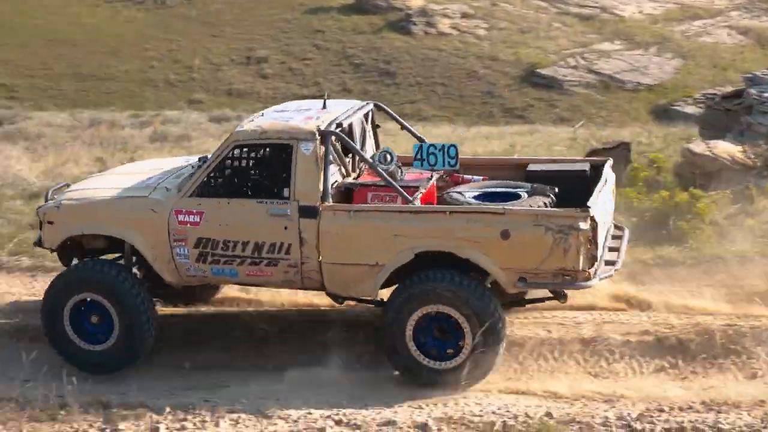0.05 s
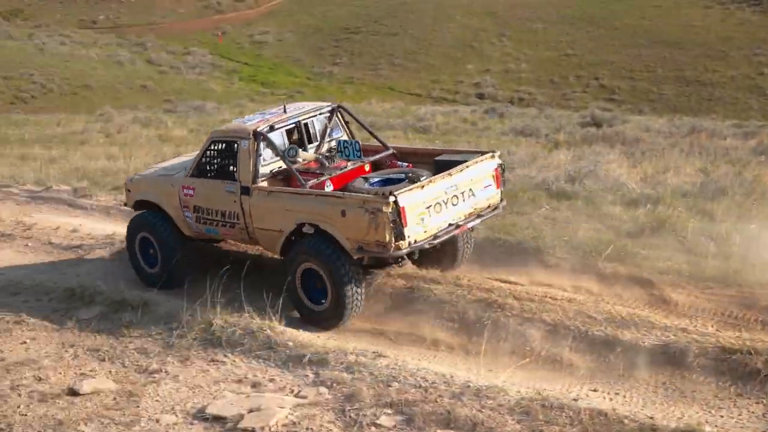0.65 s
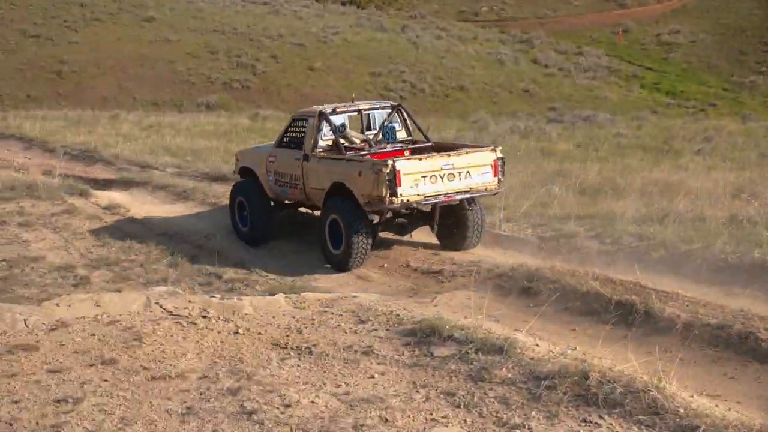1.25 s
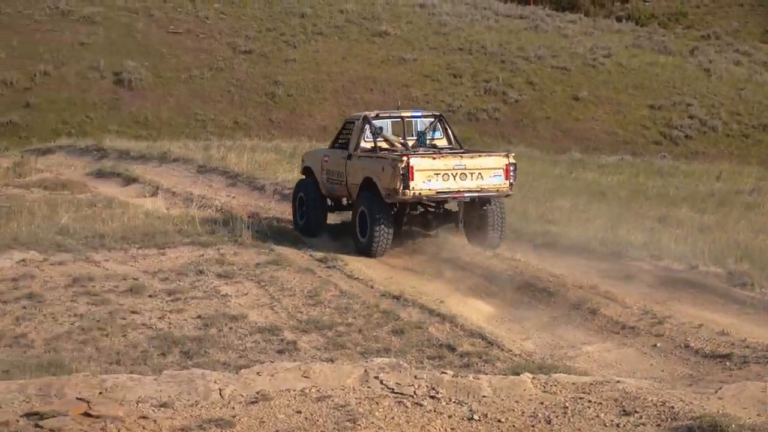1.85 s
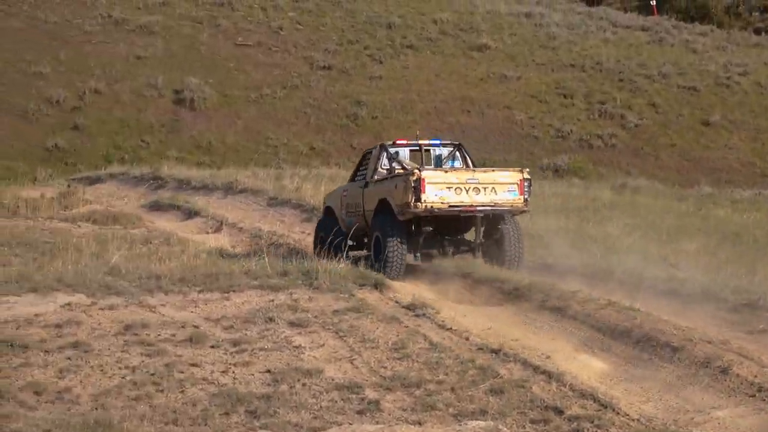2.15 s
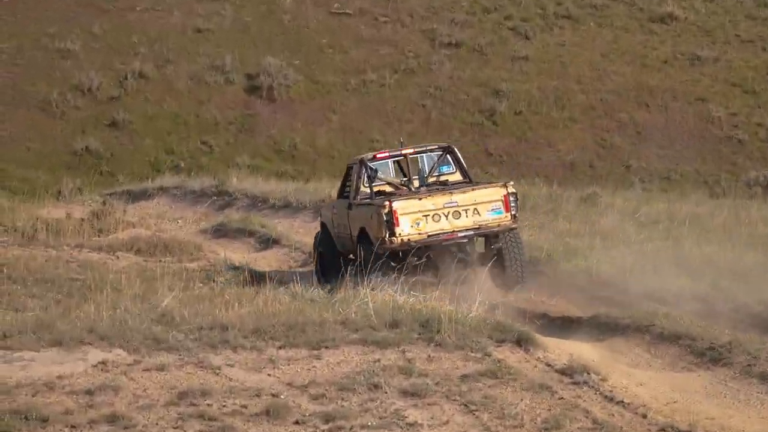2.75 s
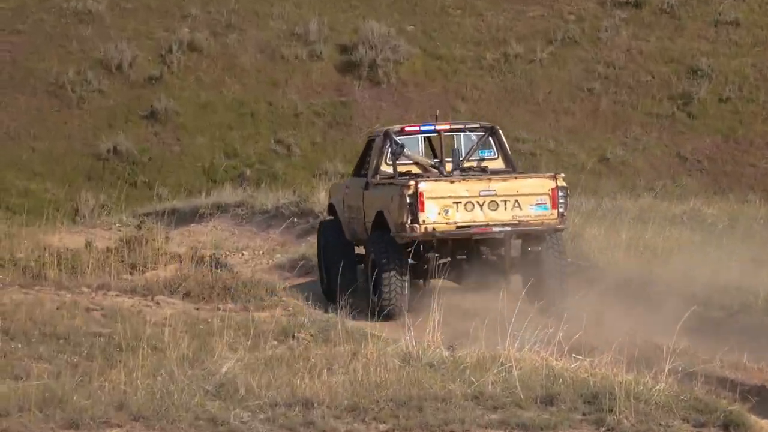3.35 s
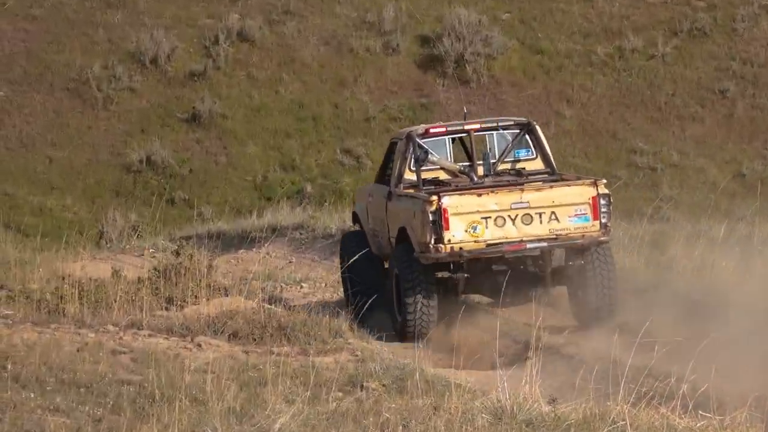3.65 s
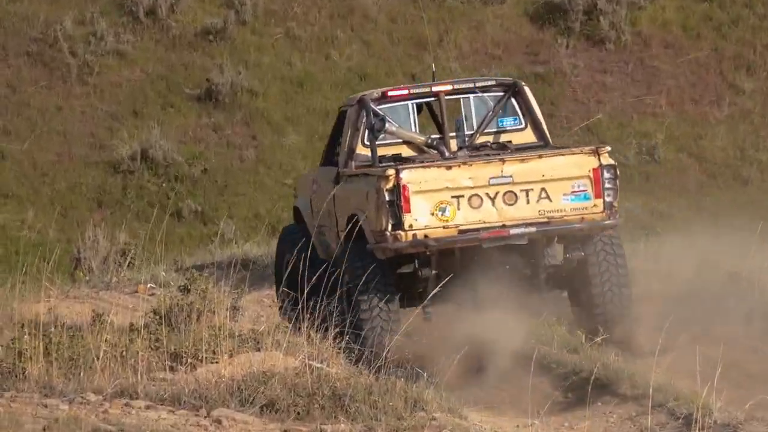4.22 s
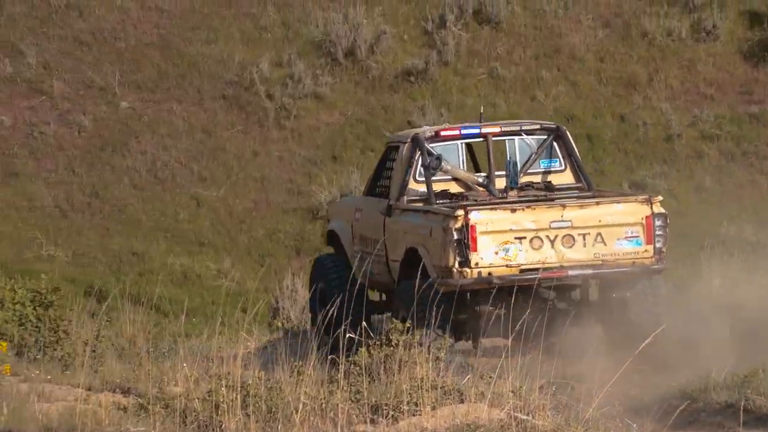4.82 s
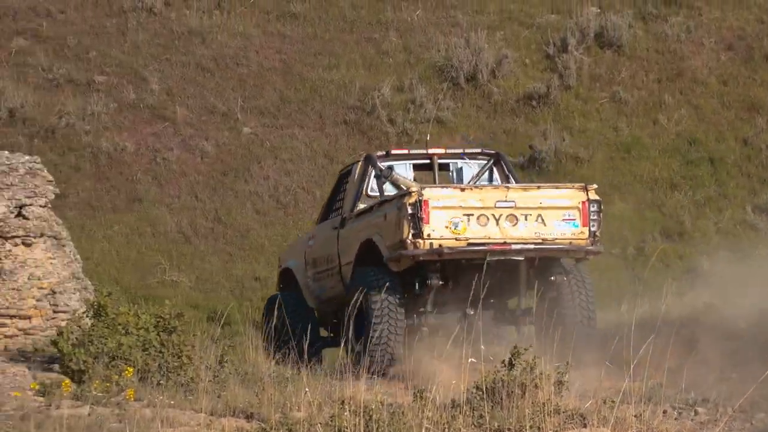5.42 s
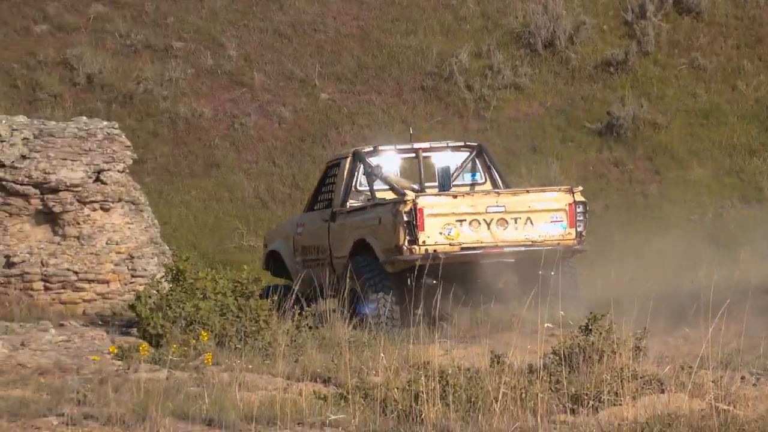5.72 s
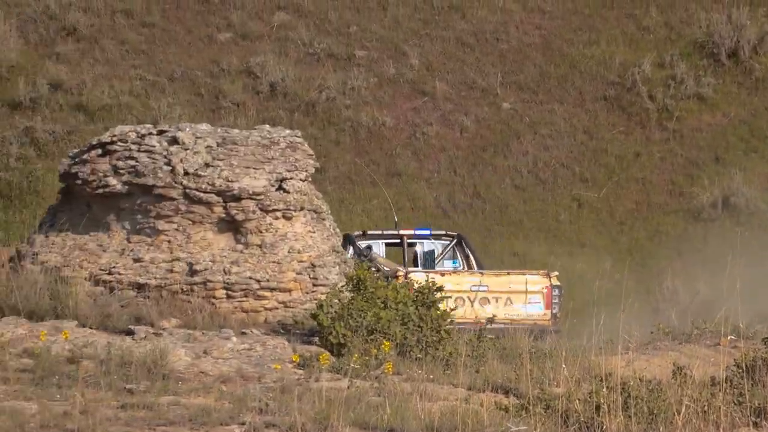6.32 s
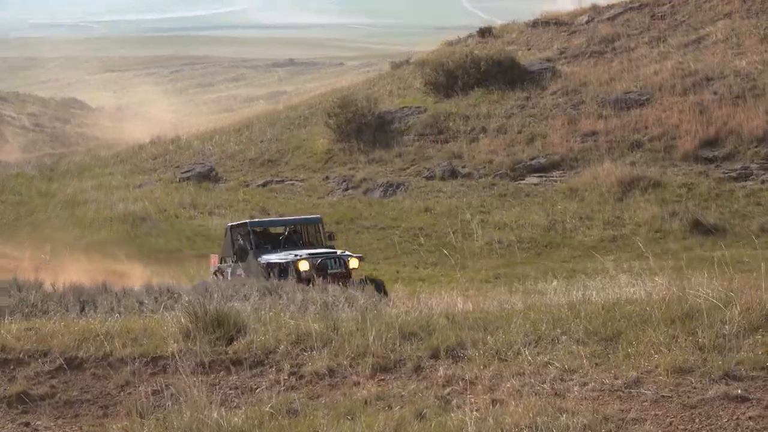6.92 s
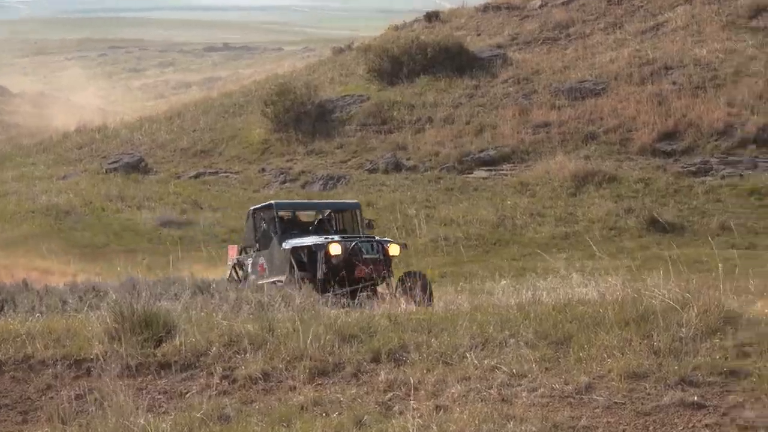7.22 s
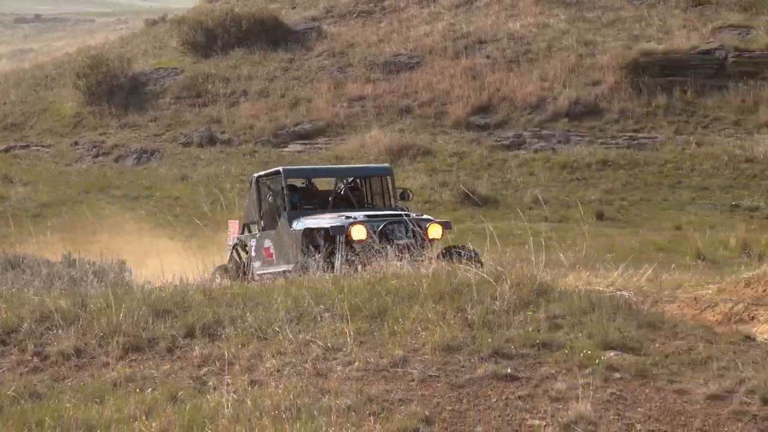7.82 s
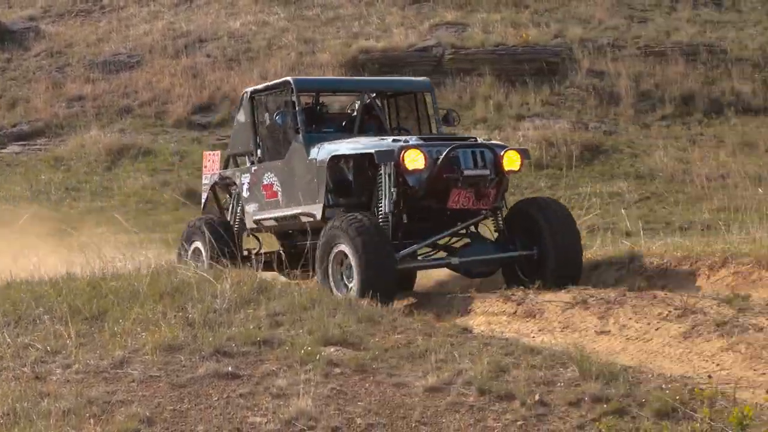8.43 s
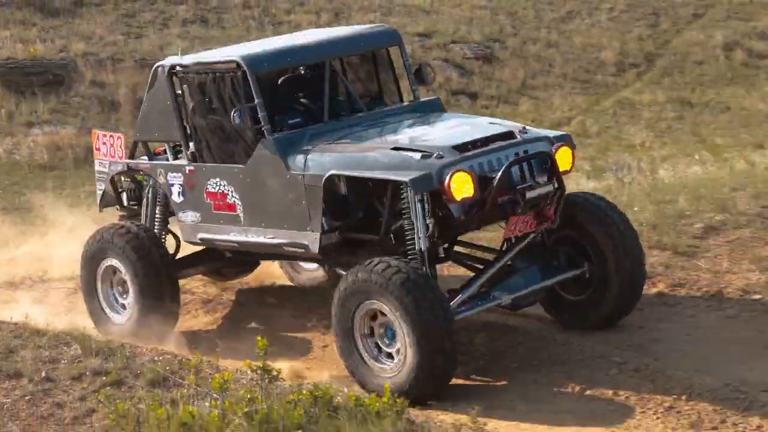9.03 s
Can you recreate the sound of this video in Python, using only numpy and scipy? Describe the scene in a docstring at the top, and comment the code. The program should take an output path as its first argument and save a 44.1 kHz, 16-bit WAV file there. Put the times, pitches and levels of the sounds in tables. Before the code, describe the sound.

Outdoors in a light breeze, a race truck crawls away with a low, surging drone, rattling bodywork, clunks and short rasping squeaks. Far-off engines rise in pitch. The sound then switches with a click to heavy wind rumbling on the microphone and an approaching V8 buggy, its revs rising and falling, its rasp and tyre crunch swelling near the end.

```python
"""A dirt trail. A four-cylinder race truck crawls away in a breeze: exhaust droning, tyres crunching,
chassis knocking in the ruts, dry suspension joints squeaking, while two distant racers wind up.
Then the scene changes with a click: a V8 buggy approaches, revving in waves, and gusts of wind
buffet the two microphone ports."""
import sys
import numpy as np
from scipy import signal
from scipy.fft import rfft, irfft, next_fast_len
from scipy.io import wavfile
from scipy.ndimage import uniform_filter1d, minimum_filter1d

SR = 44100
rng = np.random.default_rng(int(sys.argv[2]) if len(sys.argv) > 2 else 0)


def store_wav(level_fs):
    """Save 16-bit WAV to argv[1]."""
    pcm = np.round(np.clip(np.atleast_2d(level_fs), -1, 1) * 32767)
    wavfile.write(sys.argv[1], SR, pcm.T.astype(np.int16))


N = 404397
T = np.arange(N) / SR
CHANGE_S = 6.447
TREBLE_HZ, BUFFET_HZ = (4400, 8000), (400, 800)


def amp(db):
    """dB to gain."""
    return 10 ** (np.asarray(db) / 20)


def decibels(gain):
    """Gain to dB."""
    return 20 * np.log10(np.maximum(gain, 1e-9))


def unit(x):
    """Scales to rms 1."""
    return x / np.sqrt(np.mean(x ** 2) + 1e-20)


def lookup(spectrum, hz, column=1):
    """Table column, interpolated over log frequency."""
    table = np.transpose(spectrum)
    return np.interp(np.log(hz + 1), np.log(table[0] + 1), table[column])


def curves(rows):
    """Columns of a time table, per sample."""
    times_s, *columns = np.transpose(rows)
    return [np.interp(T, times_s, column) for column in columns]


def add(mix, start_s, sound):
    """Mixes a sound in at start_s."""
    part = mix[max(round(start_s * SR), 0):][:len(sound)]
    part += sound[:len(part)]


def filtered(x, response):
    """Applies the gain response(f/Hz)."""
    size = next_fast_len(len(x), True)
    return irfft(rfft(x, size) * response(np.fft.rfftfreq(size, 1 / SR)), size)[:len(x)]


def coloured(x, spectrum, band_hz):
    """Shapes x by a spectrum; rms 1 within the band."""
    x = filtered(x, lambda f: amp(lookup(spectrum, f)))
    return x / np.std(filtered(x, lambda f: (f > band_hz[0]) & (f < band_hz[1])))


def hiss(size=N):
    """White noise."""
    return rng.standard_normal(size)


def drift(rate_hz):
    """Smooth random wander up to rate_hz, rms 1."""
    step = 16
    slow = filtered(hiss(N // step + 1), lambda f: 1 / (1 + (f / step / rate_hz) ** 4))
    return unit(np.interp(T, np.arange(len(slow)) * step / SR, slow))


def swell(peak_s, width_s):
    """Gaussian rise and fall."""
    return np.exp(-((T - peak_s) / width_s) ** 2 / 2)


# Port differences: f/Hz, right lead/rad, scatter level/dB
PORTS = [(40, .5, -21), (85, 0.84, -28.5), (145, 1.7, -20), (220, 1.25, -10.5), (380, 2.05, -9),
         (700, 0.98, -7.5), (1400, 0.61, -16.5), (3000, 0.33, -34.5), (7000, .15, -11)]
def ports(x):
    """Sound reaches the right port first; ground scatter differs between ports."""
    scatter = hiss(2048) * np.hanning(2048)
    scattered = signal.oaconvolve(x, scatter / np.linalg.norm(scatter))[:N]
    side = filtered(x, lambda f: -1j * np.tan(lookup(PORTS, f) / 2))
    side += filtered(scattered, lambda f: amp(lookup(PORTS, f, column=2)))
    return np.array([x + side, x - side])


def exhaust(cycles, orders, flutter, colour_db=lambda k: 0):
    """Engine orders; the weak ones flutter most as firing strength varies."""
    note = np.zeros(N)
    for k, db in orders:
        strength = 1 + flutter * drift(11.5) * (1 if db < -5 else 0.35)
        note += amp(db + colour_db(k)) * strength * np.cos(2 * np.pi * (k * cycles + rng.random()))
    return np.sqrt(2) * note


def pulsed_noise(cycles, depth):
    """Noise swelling once a cycle."""
    return hiss() * (1 + depth * np.cos(2 * np.pi * cycles))


def panels(x, ring, t60_s=0.05):
    """Bodywork rings briefly at many close resonances."""
    t = np.arange(4096) / SR
    tail = hiss(len(t)) * amp(-60 * t / t60_s)
    ringing = signal.oaconvolve(x, tail / np.linalg.norm(tail))[:N]
    return (x + ring * ringing) / np.hypot(1, ring)


# Grit spectrum: f/Hz, level/dB
DIRT = [(1000, 7), (2500, 3), (4000, 2.5), (5200, -1), (7000, -9), (9300, -11), (10300, -19),
        (11500, -27.5), (15500, -32.5)]
def crunch(grains_per_s, grain_db, clump_db):
    """Tyres on dirt: fine hiss and clumps of cracking grit."""
    cracks = rng.random(N) < grains_per_s / SR
    grit = cracks * amp(grain_db + 2.5 * np.minimum(rng.exponential(1, N), 4))
    return coloured((1 + grit) * hiss() * amp(clump_db * drift(30)), DIRT, TREBLE_HZ)


# Firing rate: t/s, f/Hz
TRUCK_FIRING = [(0, 90.33), (0.65, 88.86), (1.2, 86.53), (1.5, 91.24), (2.26, 84.15), (2.9, 80.4),
                (3.45, 77.1), (3.69, 72.3), (4.3, 69.71), (4.7, 72.32), (5.1, 70.6), (5.5, 64),
                (6.2, 61.67), (6.44, 68.6)]
# Exhaust under throttle: t/s, level/dB
TRUCK_THROTTLE = [(0, -12.5), (0.3, -21), (1.1, -20.5), (1.33, -24.5), (1.56, -18.5), (2.3, -18.5),
                  (3.0, -21), (4.0, -19.5), (4.7, -22), (5.4, -22), (6.05, -25.5), (6.44, -23)]
# Surges: t/s, half-width/s, extra speed/ratio, boost/dB
SURGES = [(0.11, 0.071, 0.047, 2.5), (0.4, 0.048, 0.054, 0), (0.56, 0.036, .015, 5),
          (0.87, 0.096, .05, -0.5), (2.52, 0.089, .055, -0.5), (3.18, .11, .03, 1),
          (3.87, 0.0784, 0.05506, -0.5), (5.17, 0.054, .01, 2), (5.83, .11, 0.038, 2.5)]
def truck_engine():
    """The engine lugs down on a climb, surging on throttle blips or wheel slip."""
    (hz,), (db,) = curves(TRUCK_FIRING), curves(TRUCK_THROTTLE)
    for peak_s, width_s, faster, boost_db in SURGES:
        surge = swell(peak_s, width_s)
        hz, db = hz * (1 + faster * surge), db + boost_db * surge
    return hz, db


# Departure: t/s, distance/m, relative crunch level/dB
TRUCK_PATH = [(0, 3.23, -38.5), (0.35, 7.7, -37.5), (1.0, 11.1, -41), (1.4, 9.9, -39), (2.3, 23.6, -39),
              (3.6, 31.7, -36.5), (4.1, 27.7, -41), (5.2, 34.4, -43.5), (5.75, 26.7, -40),
              (6.44, 44, -39.5)]
# Exhaust orders, halves from unequal cylinders: multiple of firing rate, level/dB
TRUCK_ORDERS = [(.5, -23), (1, 1), (1.5, -29.5), (2, -15.5), (2.5, -31.5), (3, -19), (4, -31), (5, -33.5),
                (6, -35.5), (7, -31.5), (8, -33)]
# Tailpipe, gas puff and clatter spectra: f/Hz, level/dB
TAILPIPE = [(100, 0), (125, 8.5), (145, 4), (165, -2), (185, -0.5), (225, -6.5), (255, -4), (275, 2),
            (320, 1)]
PUFFS = [(60, -7), (120, 7), (180, 4.5), (270, 2.5), (380, -4), (520, -11), (800, -15), (2000, -50.5)]
CLATTER = [(250, -29.5), (450, -7.5), (560, 6), (690, 3), (870, -1.5), (1050, -4), (1350, -2.5), (2000, -5),
           (2700, -8), (4000, -18), (8000, -47.5), (12000, -48.5)]
def truck():
    """Deep exhaust drone with gas puffs, clatter and tyre crunch."""
    firing_hz, drone_db = truck_engine()
    distance_m, crunch_db = curves(TRUCK_PATH)
    near_db = decibels(distance_m[0] / distance_m)
    firings = np.cumsum(firing_hz * (1 + 0.004 * drift(22))) / SR
    drone = exhaust(firings, TRUCK_ORDERS, flutter=0.4,
                    colour_db=lambda k: lookup(TAILPIPE, k * firing_hz))
    puffs = amp(near_db - 30) * coloured(pulsed_noise(firings, depth=0.64), PUFFS, (290, 480))
    rattle = pulsed_noise(firings, depth=0.13) * amp(0.18 * drift(29))
    clatter = np.hypot(amp(near_db - 22.2), shake()) * coloured(rattle, CLATTER, (550, 2000))
    bodywork = panels(clatter, ring=0.4)
    tyres = amp(near_db + crunch_db + 3) * crunch(grains_per_s=350, grain_db=4, clump_db=1.05)
    return amp(drone_db - 0.8) * drone + puffs + bodywork + tyres


# Gusts: t/s, half-width/s, level/dB
GUSTS = [(0.22, 0.076, -30), (0.55, 0.18, -29), (1.0, 0.12, -30.5), (1.66, 0.15, -26.5), (2.17, .1, -40),
         (2.5, .12, -29.5), (2.78, 0.1, -26), (3.0, 0.076, -25.5), (4.02, .06, -38), (4.24, 0.036, -27),
         (4.5, 0.097, -46), (4.97, 0.051, -23.5), (5.2, 0.11, -23), (5.64, 0.081, -22.5), (5.92, 0.13, -26),
         (6.18, 0.11, -21), (6.505, 0.043, -5.5), (6.609, 0.06, -11), (6.75, 0.051, -17.5),
         (7.02, 0.055, -15.5), (7.59, 0.085, -13), (7.9, 0.12, -11), (8.14, 0.11, -10.5), (8.31, 0.073, -9),
         (8.47, 0.069, -9.5), (8.77, .07, -9.5), (8.98, 0.053, -9.5), (9.14, .04, -11.5)]
def wind_strength_db(steady_db):
    """Steady flow plus gusts that swell and ebb."""
    gust_power = sum((amp(db) * swell(peak_s, width_s)) ** 2 for peak_s, width_s, db in GUSTS)
    return decibels(np.sqrt(amp(steady_db) ** 2 + gust_power))


def tearing_db(wind_db):
    """Midrange buffeting grows faster than the wind."""
    return -47 + 1.41 * (wind_db + 27)


# Wind, side against mid: f/Hz, level/dB
WIND_SIDE = [(30, -22), (80, -16.5), (150, -7.5), (250, 1), (400, 2.5), (700, 5), (1500, 5), (4000, 7)]
def turbulence(spectrum, band_hz, lump_db, lean):
    """Lumpy wind noise: shared by the ports in the bass, opposed higher up, stronger on the right."""
    lumps = unit(amp(lump_db * drift(27)))
    mid, unshared = (lumps * coloured(hiss(), spectrum, band_hz) for _ in range(2))
    side = filtered(unshared, lambda f: amp(lookup(WIND_SIDE, f)))
    side += filtered(mid, lambda f: -0.3j - lean * f / (f + 120))
    return np.array([mid + side, mid - side])


# Rumble and buffeting spectra: f/Hz, level/dB
BREEZE_RUMBLE = [(10, -21.5), (25, -7), (45, 1.5), (75, 1), (130, -10), (220, -13.5), (400, -27.5),
                 (900, -52), (2000, -85), (12000, -120)]
BUFFET = [(60, -15.5), (150, 4), (280, 5.5), (400, 1), (600, -5.5), (900, -15.5), (1400, -25.5),
          (2500, -38.5), (6000, -65), (12000, -98.5)]
def breeze():
    """Light wind rumbles; only its strongest puffs reach the midrange."""
    wind_db = wind_strength_db(steady_db=-36)
    rumble = amp(wind_db - 3.5) * turbulence(BREEZE_RUMBLE, (20, 52), lump_db=-2.5, lean=0.1)
    buffet_db = np.minimum(tearing_db(wind_db) - 5.5, -42)
    return rumble + amp(buffet_db) * turbulence(BUFFET, BUFFET_HZ, lump_db=0.5, lean=0.2)


# Chassis knocks and stones: t/s, relative body level/dB, relative treble level/dB
KNOCKS = [(0.364, -14.5, -30), (0.4635, -28, -24.5), (0.4777, -26.5, -29), (0.6769, -20.5, -35),
          (0.948, -19, -45), (1.2324, -34, -34), (1.3419, -20, -31), (1.5028, -25, -55),
          (1.7697, -25.5, -39.5), (2.0, -21, -41.5), (2.364, -20, -45), (2.412, -17.5, -34),
          (2.4381, -30, -35.5), (2.5284, -16.5, -40.5), (2.644, -21.5, -39), (2.797, -33, -38.5),
          (2.9942, -19, -40), (3.0915, -26, -40), (3.2202, -20, -44), (3.3526, -21, -41),
          (3.4717, -19, -43.5), (3.6444, -24, -35.5), (3.7347, -23.5, -46), (3.9481, -18, -41.5),
          (4.35, -24.5, -55.5), (4.4513, -21.5, -49), (4.9322, -25.5, -47), (5.1983, -24, -46.5),
          (5.4189, -20.5, -44.5), (5.6349, -30, -38.5), (5.694, -20.5, -51.5), (5.8174, -25, -42),
          (5.9302, -19.5, -48.5), (6.0838, -27, -41), (6.3114, -41, -36.5), (6.3554, -37, -39.5),
          (6.697, -38, -45.5), (7.3417, -46.5, -36.5), (7.9616, -35, -41.5), (8.0492, -33, -41),
          (8.151, -31, -41), (8.2259, -23.5, -35.5), (8.437, -18, -44), (8.514, -17, -48.5)]
# Suspension clunks: t/s, relative level/dB
CLUNKS = [(0.241, -5.5), (0.251, -9), (0.275, -11), (0.516, -13.5), (1.345, -9.5), (1.367, -18)]
# Knock and clunk spectra: f/Hz, level/dB
KNOCK_BODY = [(200, -25), (450, 12.5), (750, -11), (1000, 7.5), (1350, 12.5), (2200, 6), (3500, -1.5),
              (8000, -50.5)]
CLUNK_BODY = [(250, -20), (520, 0), (680, 3), (800, 4), (900, -5.5), (1050, -2), (1300, -9.5), (2500, -29),
              (6000, -66)]
# Steel modes: f/Hz, level/dB, t60/s
STEEL_MODES = [(3920, -12, .2), (4370, 3.5, 0.2), (6260, -9, 0.51), (8300, -37, 0.099), (9340, -14.5, .2)]
def knocks(body_t60_s=0.14, tick_t60_s=0.15, clunk_t60_s=0.12):
    """Ruts jolt the chassis: dull clacks, bright ticks with a steel ring, a few heavy clunks."""
    out, t = np.zeros(N), np.arange(8192) / SR
    attack = np.minimum(t / 0.01, 1)
    for start_s, body_db, treble_db in KNOCKS:
        body = coloured(hiss(len(t)), KNOCK_BODY, (900, 2500))
        body *= amp(body_db - 10.3 - 60 * t / body_t60_s)
        tick = amp(-2 - 60 * t / tick_t60_s) * coloured(hiss(len(t)), DIRT, TREBLE_HZ)
        ring = sum(amp(db - 60 * t / t60_s) * np.sin(2 * np.pi * (hz * t + rng.random()))
                   for hz, db, t60_s in STEEL_MODES)
        ring *= amp(0.45 * (treble_db + 16.5))  # only hard blows reach the steel
        add(out, start_s, attack * (body + amp(treble_db) * (tick + ring)))
    for start_s, db in CLUNKS:
        clunk = coloured(hiss(len(t)), CLUNK_BODY, (500, 1200))
        add(out, start_s, attack * amp(db - 7 - 60 * t / clunk_t60_s) * clunk)
    return out


# Squeaks: t/s, length/s, f/Hz, relative level/dB
SQUEAKS = [(0.328, 0.085, 3900, -35), (0.393, 0.032, 2750, -34), (0.794, 0.12, 2750, -43),
           (1.199, .072, 2800, -33.5), (1.267, 0.12, 8960, -50), (2.007, 0.068, 2790, -36),
           (2.083, 0.041, 3695, -37), (2.21, .043, 2710, -40), (2.268, 0.063, 2830, -42.5),
           (2.347, .13, 3810, -43.5), (2.607, 0.039, 2755, -45), (2.714, 0.031, 2780, -39),
           (2.75, 0.028, 3680, -41), (2.855, 0.029, 2770, -35), (2.98, 0.052, 2790, -37.5),
           (3.06, 0.044, 10000, -54), (3.066, 0.055, 3525, -42.5), (3.426, 0.04, 2790, -36),
           (3.509, 0.056, 2850, -28.5), (3.534, 0.063, 2070, -42.5), (3.615, 0.03, 4160, -35),
           (3.634, 0.018, 3694, -32), (3.655, 0.033, 5200, -49), (3.685, .036, 3430, -47),
           (3.865, 0.082, 2780, -30.5), (4.238, 0.073, 2810, -32), (4.318, .035, 9900, -60),
           (5.363, .06, 2048, -47), (5.599, .056, 3328, -44), (5.852, 0.049, 3480, -44.5),
           (5.892, 0.032, 9800, -61), (6.114, .045, 5320, -48.5), (6.12, 0.054, 2049, -45),
           (6.151, 0.053, 5555, -57), (6.334, .04, 5400, -50), (6.35, 0.059, 9310, -71)]
def squeaks(scoop=0.05, sag=0.071, rasp=0.46, tail_db=-16, tail_t60_s=0.23):
    """Dry suspension joints stick and slip in rasping tones; the steel rings on briefly."""
    out, t = np.zeros(N), np.arange(8192) / SR
    grip = 1 + rasp * drift(160)
    waver = 0.004 * drift(500) + 0.003 * drift(50)
    for start_s, length_s, hz, db in SQUEAKS:
        span = slice(int(start_s * SR), int(start_s * SR) + len(t))
        progress = np.minimum(t / length_s, 1)
        if hz < 3000:  # scoops up into a clear note
            bend = waver[span] * (2.5 - 2 * progress) - scoop * (np.exp(-5 * progress) - 0.1)
        else:  # scrapes and sags
            bend = 4 * waver[span] + sag * (0.5 - progress)
        phase = 2 * np.pi * np.cumsum(hz * (1 + bend)) / SR
        overtones = sum(amp(level_db + 2 * rng.standard_normal()) * np.sin(k * phase)
                        for k, level_db in [(2, -15), (3, -21)] if k * hz < 9500)
        tone = np.sin(phase) + overtones * amp(-0.5 * max(db + 41.5, 0))  # louder is purer
        slip = np.sin(np.pi * progress) * grip[span]
        tail = progress * amp(tail_db - 60 * np.maximum(t - length_s, 0) / tail_t60_s)
        add(out, start_s, 2 * amp(db) * tone * (slip + tail))
    return out


def shake(gain_db=-16.5, decay_s=0.06):
    """Rattle envelope: each knock sets off the loose bodywork."""
    return sum(amp(db + gain_db) * (T > start_s) * np.exp(-abs(T - start_s) / decay_s)
               for start_s, db, _ in KNOCKS)


# Distant V8: t/s, cycle rate/Hz, relative level/dB
FAR_V8 = [(3.35, 29.7, -34.5), (3.55, 33.5, -29.5), (3.85, 37.7, -29), (4.2, 37, -33.5),
          (4.43, 39.4, -30.5), (4.69, 38, -31.5), (4.9, 39.7, -29.5), (5.45, 41.5, -39.5),
          (6.08, 44.2, -35.5), (6.44, 35.5, -36.5)]
# Exhaust orders: multiple of cycle rate, level/dB
FAR_V8_ORDERS = [(3, 1.5), (5, 1.5), (6, -24.5), (7, -34), (8, -41), (16, -51)]
def far_v8():
    """One bank's uneven firing puts the weight on orders 3 and 5."""
    cycle_hz, db = curves(FAR_V8)
    fade_in = np.clip((T - FAR_V8[0][0]) / 0.19, 0, 1)
    return amp(db - 1) * fade_in * exhaust(np.cumsum(cycle_hz) / SR, FAR_V8_ORDERS, flutter=0.3)


# High-revving racer: t/s, firing rate/Hz, level/dB
FAR_RACER = [(4.75, 279, -63), (4.95, 279, -40), (5.35, 302, -51), (5.72, 323, -40), (5.95, 325, -39),
             (6.2, 346, -42), (6.44, 348, -41)]
# Exhaust orders: multiple of firing rate, level/dB
FAR_RACER_ORDERS = [(1, 0.5), (2, -7), (3, -16)]
def far_racer():
    """A thin engine note climbs in the distance."""
    firing_hz, db = curves(FAR_RACER)
    note = exhaust(np.cumsum(firing_hz) / SR, FAR_RACER_ORDERS, flutter=0.3)
    return amp(db) * note * (T > FAR_RACER[0][0])


def click(decay_s=0.0023):
    """The waveform jumps at the scene change: one sharp click."""
    return -np.exp(-abs(T - CHANGE_S) / decay_s) * (T >= CHANGE_S)


# Revs: t/s, cycle rate/Hz
BUGGY_REVS = [(6.45, 52.5), (6.58, 45.3), (6.74, 41.4), (6.93, 43.4), (7.15, 42.7), (7.46, 38.7),
              (7.6, 41.8), (7.85, 45.7), (8.15, 40.6), (8.28, 42), (8.56, 28), (8.66, 38.7), (8.78, 42.4),
              (8.92, 45.7), (9.03, 43.3), (9.17, 30)]
# Approach: t/s, distance/m
BUGGY_PATH = [(6.45, 36), (6.72, 31), (7.3, 41.5), (7.85, 29), (8.2, 28.2), (8.55, 16.5), (8.8, 12.7),
              (8.97, 11), (9.17, 17)]
# Tyres on grass, then bare dirt: t/s, relative level/dB
BUGGY_TYRES = [(6.45, -55), (7.15, -60), (7.28, -53.5), (7.65, -56), (7.8, -51.5), (8.62, -50),
               (8.76, -39.5), (8.97, -38), (9.1, -46)]
# Exhaust orders: multiple of cycle rate, level/dB
BUGGY_ORDERS = [(2, -25.5), (3, -25.5), (4, -16), (5, 0.5), (6, -14.5), (7, -11.5), (8, -14.5)]
def buggy(cruise_hz=45.5, cruise_m=41.2):
    """A V8 revs in waves over crunching tyres; note, rasp and clatter grow with revs and nearness."""
    (cycle_hz,), (distance_m,), (tyre_db,) = curves(BUGGY_REVS), curves(BUGGY_PATH), curves(BUGGY_TYRES)
    near_db, rev_db = decibels(cruise_m / distance_m), decibels(cycle_hz / cruise_hz)
    over_cruise_db = near_db + 1.96 * rev_db
    clatter_db = 0.97 * near_db + 0.66 * rev_db - 50.5
    cycles = np.cumsum(cycle_hz * (1 + 0.00301 * drift(21.5))) / SR
    rasp_orders = [(k, -6 - 0.22 * k + 3 * rng.standard_normal()) for k in range(9, 49)]
    rasp = amp(1.9 * over_cruise_db - 45.5) * unit(exhaust(cycles, rasp_orders, flutter=0.64))
    clatter = amp(clatter_db) * coloured(pulsed_noise(4 * cycles, depth=0.63), CLATTER, (1500, 3000))
    tyres = amp(tyre_db + 1.35) * crunch(grains_per_s=500, grain_db=5, clump_db=0.8)
    note = amp(over_cruise_db - 23.5) * exhaust(cycles, BUGGY_ORDERS, flutter=0.55)
    return note + rasp + clatter + tyres


# Strong-wind spectrum: f/Hz, level/dB
GUST_RUMBLE = [(10, -15.5), (25, -6), (45, -3.5), (75, -2), (110, -4), (160, -8.5), (230, -10.5),
               (400, -23), (900, -59), (2000, -77), (12000, -120)]
def gusts(stall_db=-23.5):
    """Strong wind tears at the microphone; its rumble levels off above stall_db."""
    wind_db = wind_strength_db(steady_db=-24)
    rumble_db = 6.5 - decibels(np.hypot(amp(-wind_db), amp(-stall_db)))
    rumble = amp(rumble_db) * turbulence(GUST_RUMBLE, (25, 140), lump_db=4, lean=0.3)
    buffet = amp(tearing_db(wind_db) - 1.8) * turbulence(BUFFET, BUFFET_HZ, lump_db=0.5, lean=0.76)
    return rumble + buffet


def scene():
    """Truck, then a hard change to the buggy; knocks run through both."""
    truck_scene = ports(truck() + far_v8() + far_racer()) * amp([[-0.6], [0.6]]) + breeze()
    buggy_scene = ports(buggy()) * amp([[-1.4], [0.7]]) + gusts()
    dip = np.clip(abs(T - CHANGE_S) / 0.001, 0, 1)
    return dip * np.where(T < CHANGE_S, truck_scene, buggy_scene) + click() + ports(squeaks() + knocks())


def record(dry, ceiling=0.47, cutoff_hz=15700):
    """Fast limiter on the gusts, soft clip, low-pass."""
    gain = np.minimum(1, ceiling / (abs(dry.mean(0)) + 1e-9))
    limited = dry * uniform_filter1d(minimum_filter1d(gain, size=600), size=400)
    rounded = limited / (1 + limited ** 8) ** (1 / 8)
    lowpass = signal.firwin(511, cutoff_hz, window=("kaiser", 9), fs=SR)
    return signal.oaconvolve(rounded, lowpass[None], "same")


dry = scene()
out = record(dry)
store_wav(out)
```